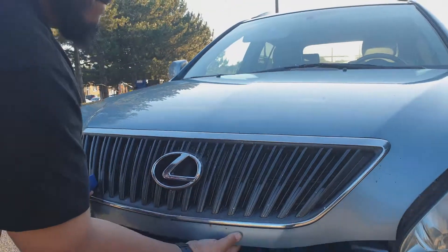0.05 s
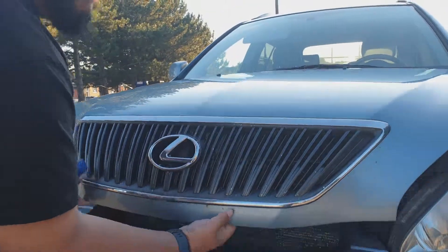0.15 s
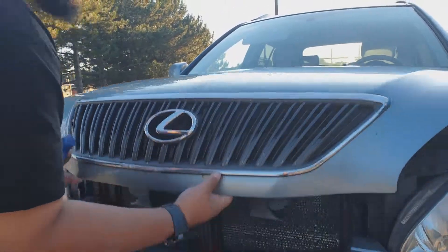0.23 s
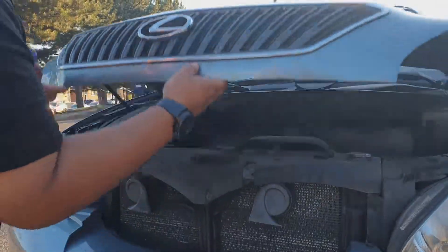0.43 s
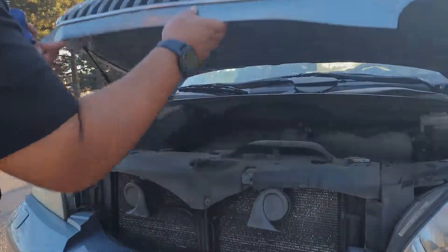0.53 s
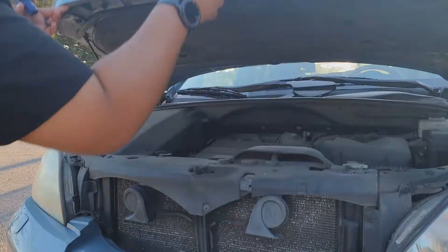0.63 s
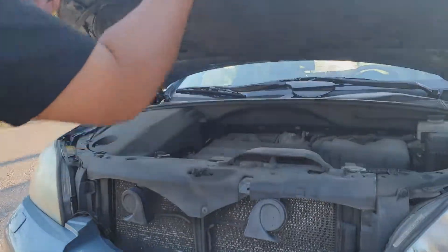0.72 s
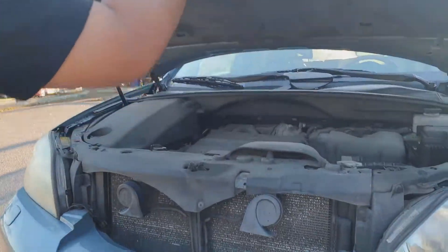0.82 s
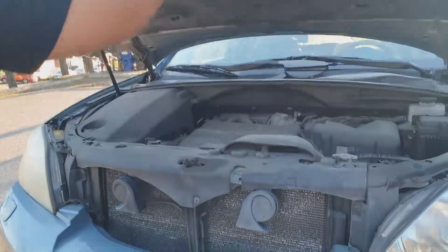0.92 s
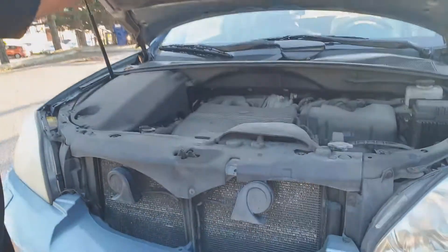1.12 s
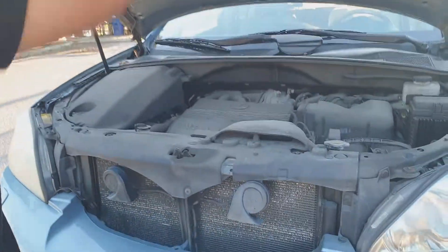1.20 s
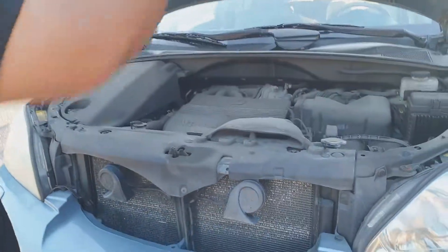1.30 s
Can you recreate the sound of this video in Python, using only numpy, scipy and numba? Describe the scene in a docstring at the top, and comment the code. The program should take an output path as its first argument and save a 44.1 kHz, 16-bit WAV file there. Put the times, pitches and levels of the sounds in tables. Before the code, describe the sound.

Sharp metallic clunk of a car hood popping open, followed by soft gas-strut hiss and wind rumble

```python
"""The safety catch of a car bonnet scrapes, slips off and chatters, an arm's length from the microphone outdoors.
Its contacts excite decaying modes of the catch; the hook cracks, and bonnet and engine bay ring on.
Gas struts hiss as the bonnet rises: noise echoes in two chambers, the one ahead of the piston shortening and
sweeping up in pitch, the one behind it lengthening and sinking.
Shaped noise makes the wind that buffets the microphone throughout, over faint distant traffic."""
import sys
import numpy as np
from scipy import signal
from scipy.fft import rfft, irfft
from scipy.io import wavfile
from scipy.ndimage import uniform_filter1d, map_coordinates
from numba import njit

SR = 44100
rng = np.random.default_rng(int(sys.argv[2]) if len(sys.argv) > 2 else 0)


def transcribe(signal):
    """Save signal, clipped to [-1, 1], as a 16-bit WAV file at the path in sys.argv[1]."""
    frames = np.atleast_2d(signal).T
    limited = np.clip(frames, -1, 1)
    pcm = np.round(limited * 32767).astype(np.int16)
    wavfile.write(sys.argv[1], SR, pcm)


N = 59535
T = np.arange(N) / SR

# spectrum of distant traffic: [f/Hz, level/dB]
TRAFFIC_COLOUR = [(40, 5.5), (200, 3), (450, -19.5), (800, 3.5), (1300, -7.5), (2500, -15), (6000, -37),
                  (16000, -38)]
# wind on the microphone: [t/s, rumble level/dB, flutter level/dB]
GUSTS = [(0, -33.5, -52), (.03, -51, -70), (.09, -61, -68), (.125, -43, -55.5), (.16, -41, -56.5),
         (.205, -32, -52.5), (.25, -35, -45.5), (.29, -43.5, -47), (.4, -39.5, -45.5), (.48, -36.5, -48.5),
         (.52, -45.5, -59), (.57, -36, -50.5), (.63, -50.5, -58.5), (.73, -48.5, -57), (.79, -42, -86),
         (.85, -47, -63), (.92, -40.5, -49.5), (.97, -45, -48.5), (1.05, -42, -51.5), (1.11, -36.5, -45.5),
         (1.2, -46, -49), (1.255, -39.5, -52), (1.35, -42.5, -71)]
# spectra of the wind's rumble and flutter: [f/Hz, level/dB]
RUMBLE_COLOUR = [(15, -19), (35, -11), (60, -0.5), (110, -2), (180, -6.5), (280, -20), (500, -28.5),
                 (1500, -78)]
FLUTTER_COLOUR = [(80, -47), (230, 5), (450, -4.5), (900, -12.5), (1600, -26), (3000, -39), (8000, -60)]
# length of the chamber ahead of the piston: [t/s, length/m]
AHEAD_LENGTH = [(.35, .19), (.55, .173), (.62, .156), (.75, .1225), (.9, .095), (1., .0755), (1.1, .056),
                (1.2, .039), (1.35, .024)]
# gas through the piston: [t/s, high hiss level/dB, chamber rush level/dB]
GAS_FLOW = [(0, -69, -62.5), (.15, -96, -71.5), (.23, -62.5, -59), (.29, -52.5, -54), (.42, -43, -57.5),
            (.51, -45, -57.5), (.64, -46.5, -59), (.69, -45, -51), (.8, -42, -55), (.92, -42.5, -50),
            (1.07, -45, -53), (1.17, -48, -51), (1.25, -50.5, -56), (1.35, -53, -57.5)]
# spectra of the high hiss and of the gas feeding the chambers: [f/Hz, level/dB]
HISS_COLOUR = [(2000, -28.5), (5000, -23.5), (8500, -13), (10500, -4.5), (12000, -0.5), (13500, -1),
               (15000, 1), (16000, -10)]
RUSH_COLOUR = [(500, -1), (1300, 0), (2100, -5.5), (3200, -12.5), (4200, -2), (5300, 3), (7500, -0.5),
               (10000, -10.5), (15000, -1.5)]
# lowest resonance of the two chambers: [t/s, level ahead/dB, level behind/dB]
CHAMBER_TONES = [(.35, -99, -97), (.48, -81, -70), (.55, -58, -76), (.59, -71, -90), (.625, -50.5, -84),
                 (.67, -62, -77), (.76, -50.5, -55), (.81, -78, -58.5), (.88, -56, -57.5), (1., -86, -56.5),
                 (1.08, -73, -68), (1.35, -87, -65)]
# brief partials of the shrinking chamber: [multiple of its lowest f, loudest at t/s, length/s, level/dB]
PARTIALS = [(2, 0.832, 0.037, -62.5), (2, 0.948, 0.054, -62), (2, 1.05, 0.044, -57),
            (3, 0.946, 0.082, -56.5), (4, 0.848, 0.076, -60), (5, 0.843, 0.091, -56),
            (1, 1.178, 0.028, -64)]
# small knocks and scrapes of hand and catch: [t/s, level/dB, rise/s, t60/s, f/Hz, width/Hz]
SCRAPES = [(0.1444, -60, .0003, 0.0062, 700, 1090), (0.233, -67, .0005, 0.028, 648, 914),
           (0.2411, -36.5, 0.00063, 0.026, 510, 475), (.311, -36, 0.017, 0.13, 740, 150),
           (0.314, -44.5, 0.012, 0.14, 1380, 200), (.331, -27.5, 0.0032, 0.06, 300, 200),
           (.412, -48, .004, 0.039, 1680, 800), (0.583, -45, 0.0011, 0.016, 540, 700),
           (0.914, -34.5, 0.0013, 0.098, 205, 162), (1.019, -43.5, .0005, 0.028, 890, 1080),
           (1.09, -45, 0.0011, 0.049, 443, 660), (1.241, -30.5, .002, 0.098, 150, 107),
           (1.256, -51, 0.0023, 0.054, 4200, 5000)]
# dense ring of panel and engine bay: [f/Hz, level/dB, rise/s, t60/s, side share]
PANEL_BANDS = [(299, -32, 0.013, 0.2, 0.16), (480, -36.5, 0.018, 0.27, .25), (803, -27, 0.0044, 0.26, 0.49),
               (1204, -21, 0.002, .17, 0.8), (2010, -25.5, 0.00067, .16, 0.99),
               (3230, -33, 0.0026, 0.15, 1), (4900, -27, 0.0026, 0.087, 1.),
               (7700, -37.5, 0.0013, 0.15, 1.), (12500, -18.5, 0.00203, 0.063, 0.88)]
# modes of the bonnet: [f/Hz, level/dB, t60/s]
BONNET_MODES = [(290.3, -32.5, 0.2), (415, -21.5, 0.16), (460.2, -18.5, 0.12), (658, -26.5, 0.19),
                (757, -23, 0.19), (917, -32.5, 0.31), (1042, -21.5, 0.14), (1630, -23, 0.11),
                (2017, -26.5, 0.094), (2010, -25, 0.11), (2600, -32, 0.1), (2872, -20.5, 0.046)]
# hard clicks of the hook: [t/s, level/dB, t60/s]
CLICKS = [(0.3435, -14.5, 0.018), (0.3459, -15.5, 0.021), (0.3479, -17.5, 0.021), (0.3494, -21.5, 0.031),
          (0.3592, -26, 0.011)]
# spectrum of a click: [f/Hz, level/dB]
CLICK_COLOUR = [(200, -10), (900, 11.5), (2000, 18.5), (2800, -0.5), (4500, -3.5), (7000, -10.5),
                (9500, -0.5), (12500, 2), (16000, -35)]
# short modes of the steel hook: [f/Hz, level relative to the click/dB, t60/s]
HOOK_MODES = [(1240, -9, 0.011), (1690, -8, 0.0097), (2030, -10.5, 0.014)]
# modes of the chattering catch: [f/Hz, relative level/dB, t60/s]
CATCH_MODES = [(733, -8, 0.023), (1122, -3, 0.018), (1473, -3, .02), (1850, -8.5, 0.016),
               (2280, -15, 0.031), (3370, -18.5, 0.018)]

TRAFFIC_DB = -57
WIND_PAN_DB, FLUTTER_PAN_DB = 6, -4  # left level over right
FLUTTER_DEPTH_DB, FLUTTER_HZ, EDDY_S = 8, 79, .06
SOUND_M_S, TUBE_M = 343, .2635  # speed of sound; both chambers end to end
AHEAD_ECHO, BEHIND_ECHO, BEHIND_DB = .58, .4, -1  # gain per round trip; rush level behind
TONE_WIDTH_HZ, PARTIAL_WIDTH_HZ = 49, 210
PATCH_HZ, PATCH_S, HISS_PATCH_DB, RUSH_PATCH_DB = 383.8, .035, 6.5, 5.5  # size and depth of the flicker
SNAP_S, CHATTER_HZ, CHATTER_S = .3441, 365.4, .0177
CHATTER_GROWTH_DB, CHATTER_JITTER_S, CHATTER_SCATTER_DB = .05, .00002, 8.5  # growth per contact
RING_DB, RING_PAN_DB = -17, -2.9
BONNET_RISE_S, BONNET_SIDE = .0071, .17
CEILING, TOP_HZ = .62, 16050


def undb(db):
    """A level in decibels is 20 log10 of the amplitude gain."""
    return 10 ** (np.asarray(db) / 20)


def unit(x):
    """Normalise each signal to rms 1."""
    return x / np.sqrt(np.mean(x ** 2, axis=-1, keepdims=True))


def curve(table, axis=1):
    """Linear interpolation of one table column over time."""
    rows = np.array(table)
    return np.interp(T, rows[:, 0], rows[:, axis])


def pan(db):
    """Interchannel level difference, shared between left and right gains."""
    return undb(np.array([[db], [-db]]) / 2)


def spread(pair, side):
    """Mid-side stereo: the second signal enters the two channels in opposite phase."""
    return (pair[0] + side * pair[1] * np.array([[1], [-1]])) / np.hypot(1, side)


def shaped(gain):
    """Filter two unrelated white noises by a gain per frequency bin."""
    return unit(irfft(rfft(rng.standard_normal((2, N))) * gain, N))


def noise(colour):
    """Coloured noise: spectral levels interpolated over log frequency."""
    hz, db = np.array(colour).T
    bins = np.fft.rfftfreq(N, 1 / SR) + 1  # avoids log 0
    return shaped(undb(np.interp(np.log(bins), np.log(hz), db)))


def band(hz, width_hz):
    """Resonant noise band: response falls with the square of the detuning."""
    bins = np.fft.rfftfreq(N, 1 / SR) + 1
    detuning = (bins - hz ** 2 / bins) / width_hz
    return shaped(1 / (1 + detuning ** 2))


def decay(age, t60):
    """Exponential damping: 60 dB lost in t60."""
    return np.exp(-np.log(1000) * age / t60)


def blow(start, rise, t60):
    """Impact envelope: exponential build-up and damping."""
    age = np.maximum(T - start, 0)
    return (1 - np.exp(-age / rise)) * decay(age, t60)


def lowpass_noise(cutoff_hz, white):
    """Slow random variation: white noise smoothed by a second-order low-pass."""
    return signal.sosfilt(signal.butter(2, cutoff_hz, fs=SR, output="sos"), white)


def traffic():
    """Superposition of many distant sources, heard as steady coloured noise."""
    return undb(TRAFFIC_DB) * spread(noise(TRAFFIC_COLOUR), side=.9)


def wind():
    """Turbulent pressure: rumble and quick flutter, unrelated at left and right."""
    eddies = unit(lowpass_noise(FLUTTER_HZ, rng.standard_normal((2, N))))
    flutter = unit(noise(FLUTTER_COLOUR) * undb(FLUTTER_DEPTH_DB * np.tanh(eddies)))
    rumble = noise(RUMBLE_COLOUR)
    # level the slow swells so that the gust curve sets them
    rumble = rumble / np.sqrt(uniform_filter1d(rumble ** 2, int(EDDY_S * SR)))
    low = pan(WIND_PAN_DB) * undb(curve(GUSTS, axis=1)) * rumble
    return low + pan(FLUTTER_PAN_DB) * undb(curve(GUSTS, axis=2)) * flutter


@njit
def tube(x, lag, echo):
    """Standing waves from repeated reflection, with a changing round trip in samples."""
    y = x.copy()
    for i in range(len(x)):
        at = i - lag[i]
        if at >= 0:
            k = int(at)
            y[i] += echo * (y[k] + (at - k) * (y[k + 1] - y[k]))
    return y


def chamber(hz, echo):
    """Gas noise excites a tube whose round trip lasts one period of its lowest resonance."""
    return unit(np.array([tube(gas, SR / hz, echo) for gas in noise(RUSH_COLOUR)]))


def whistle(hz, width_hz):
    """Narrow-band noise: a complex random envelope on a carrier of changing pitch."""
    white = rng.standard_normal((2, N)) + 1j * rng.standard_normal((2, N))
    carrier = np.exp(2j * np.pi * np.cumsum(hz) / SR)
    return unit(np.real(lowpass_noise(width_hz / 2, white) * carrier))


def patchy(x, depth_db):
    """Random modulation over time and frequency: neighbouring bands swell and fade apart."""
    hz, s, cells = signal.stft(x, SR, nperseg=512)
    places = np.meshgrid(hz / PATCH_HZ, s / PATCH_S, indexing="ij")
    levels = map_coordinates(rng.standard_normal((256, 256)), places, order=1, mode="mirror")
    return unit(signal.istft(cells * undb(depth_db * levels), SR)[1][:, :N])


def struts():
    """Half-wave resonance, f = c / 2L: gas noise sounds a shrinking and a growing chamber."""
    ahead_m = curve(AHEAD_LENGTH)
    ahead_hz = SOUND_M_S / (2 * ahead_m)
    behind_hz = SOUND_M_S / (2 * (TUBE_M - ahead_m))

    rush = chamber(ahead_hz, AHEAD_ECHO) + undb(BEHIND_DB) * chamber(behind_hz, BEHIND_ECHO)
    gas = undb(curve(GAS_FLOW, axis=1)) * patchy(noise(HISS_COLOUR), HISS_PATCH_DB)
    gas = gas + undb(curve(GAS_FLOW, axis=2)) * patchy(rush, RUSH_PATCH_DB)

    tones = 0
    for column, hz in [(1, ahead_hz), (2, behind_hz)]:
        tone = spread(whistle(hz, TONE_WIDTH_HZ), side=.53)
        tones = tones + undb(curve(CHAMBER_TONES, axis=column)) * tone

    partials = 0
    for multiple, peak, length, db in PARTIALS:
        swell = np.exp(-((T - peak) / length) ** 2)
        tone = whistle(multiple * ahead_hz, PARTIAL_WIDTH_HZ)
        partials = partials + undb(db) * swell * patchy(tone, RUSH_PATCH_DB)
    return gas + pan(-.5) * tones + partials


def scrapes():
    """Friction and soft impact: damped noise bands as the bonnet is handled."""
    return sum(undb(db) * blow(start, rise, t60) * spread(band(hz, width), side=.68)
               for start, db, rise, t60, hz, width in SCRAPES)


def panel():
    """High modal density: sheet metal and engine bay ring as noise bands, each with its own damping."""
    return sum(undb(db) * blow(SNAP_S, rise, t60) * spread(band(hz, .5 * hz), side)
               for hz, db, rise, t60, side in PANEL_BANDS)


def bonnet():
    """Free vibration: damped modes of the released bonnet, differing in phase between mid and side."""
    ring = 0
    for hz, db, t60 in BONNET_MODES:
        phase = rng.uniform(0, 2 * np.pi, (2, 1)) * np.array([[0], [1]])  # the mid starts at zero
        pair = np.sin(2 * np.pi * hz * (T - SNAP_S) + phase)
        ring = ring + undb(db) * blow(SNAP_S, BONNET_RISE_S, t60) * spread(pair, BONNET_SIDE)
    return pan(RING_PAN_DB) * ring


def clicks():
    """Hard impact of steel on steel: broadband cracks, each exciting short modes of the hook."""
    cracks, hook = 0, 0
    for start, db, t60 in CLICKS:
        cracks = cracks + undb(db) * blow(start, .00016, t60)
        for hz, mode_db, mode_t60 in HOOK_MODES:
            tone = np.sin(2 * np.pi * hz * (T - start))
            hook = hook + undb(db + mode_db) * blow(start, .0001, mode_t60) * tone
    return spread(noise(CLICK_COLOUR), side=.88) * cracks + pan(RING_PAN_DB) * hook


def latch():
    """Impulse response: each contact of the slipping, chattering hook excites the catch's modes."""
    order = np.arange(12)
    chance = rng.standard_normal((len(order), 2))
    times = SNAP_S + order / CHATTER_HZ + CHATTER_JITTER_S * chance[:, 0]
    sizes = undb(CHATTER_GROWTH_DB * order + CHATTER_SCATTER_DB * chance[:, 1])
    sizes = sizes * np.clip(CHATTER_S * CHATTER_HZ - order, 0, 1)  # silences contacts after the chatter
    contacts = np.bincount((times * SR).astype(int), sizes, N)
    ring = 0
    for k, (hz, db, t60) in enumerate(CATCH_MODES):
        sign = (-1) ** k  # neighbouring modes in opposite phase
        ring = ring + sign * undb(db) * np.sin(2 * np.pi * hz * T) * decay(T, t60)
    return undb(RING_DB) * pan(RING_PAN_DB) * signal.fftconvolve(contacts, ring)[:N]


def scene():
    """Linear superposition of the catch and all other sources."""
    return latch() + clicks() + bonnet() + panel() + scrapes() + struts() + wind() + traffic()


def record(dry):
    """Saturation and band limiting: loud peaks are rounded, the start fades in, the top is cut."""
    rounded = CEILING * np.tanh(dry / CEILING) * np.minimum(T / .004, 1)
    return signal.sosfilt(signal.ellip(10, .2, 70, TOP_HZ, fs=SR, output="sos"), rounded)


dry = scene()
out = record(dry)
transcribe(out)
```